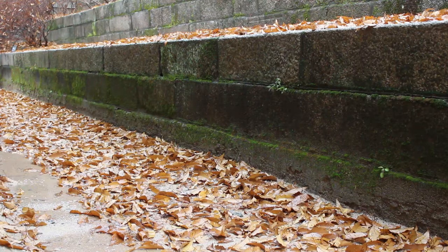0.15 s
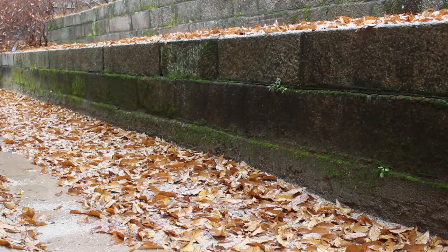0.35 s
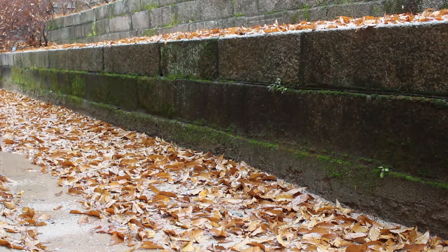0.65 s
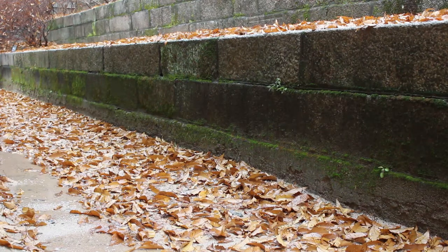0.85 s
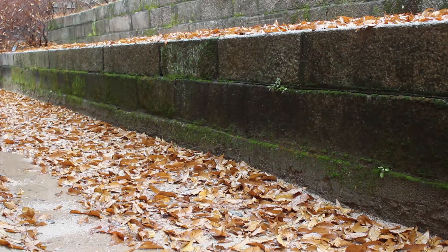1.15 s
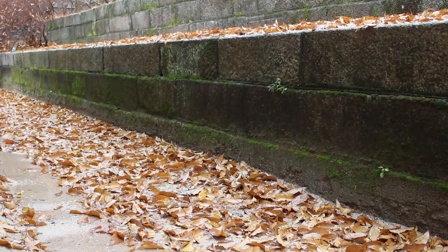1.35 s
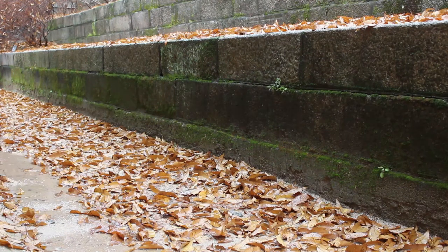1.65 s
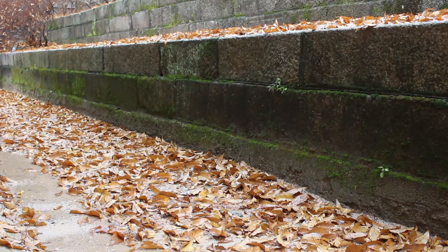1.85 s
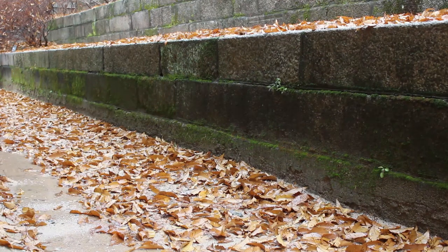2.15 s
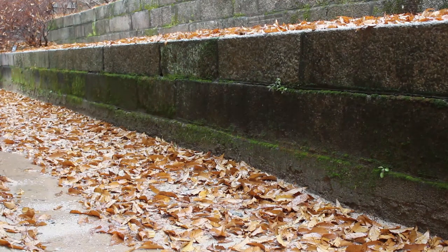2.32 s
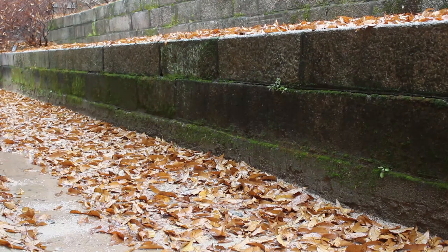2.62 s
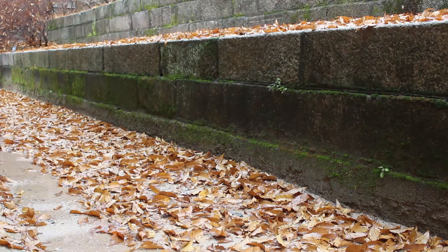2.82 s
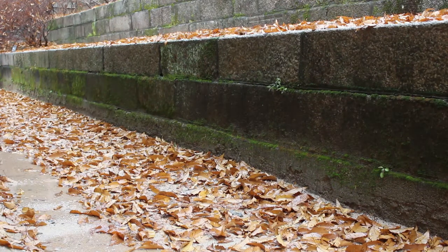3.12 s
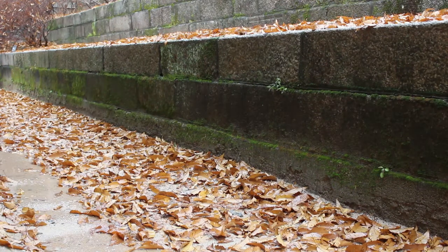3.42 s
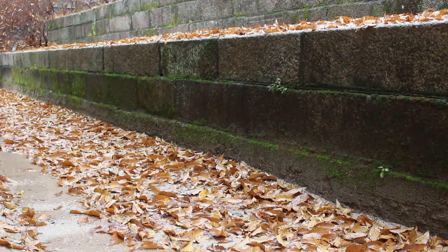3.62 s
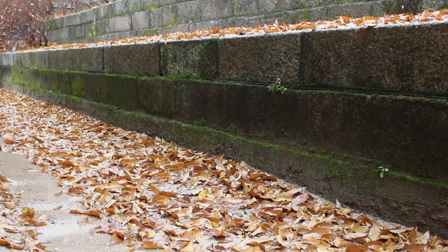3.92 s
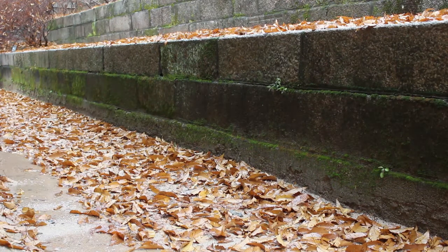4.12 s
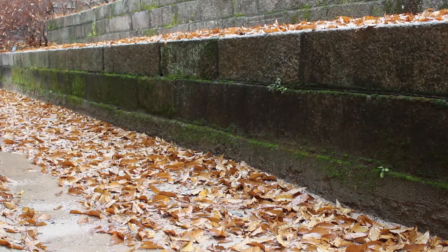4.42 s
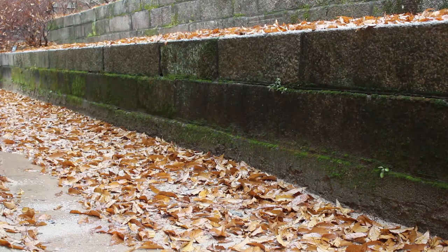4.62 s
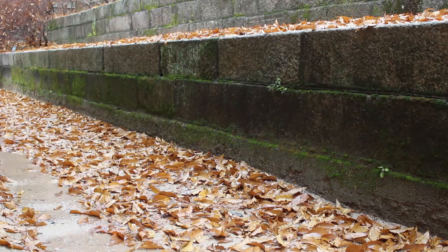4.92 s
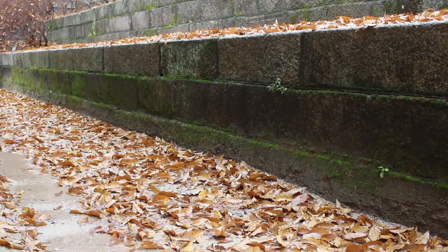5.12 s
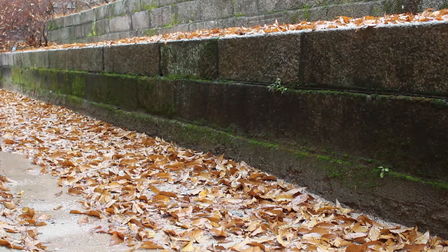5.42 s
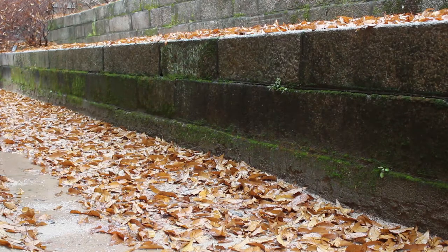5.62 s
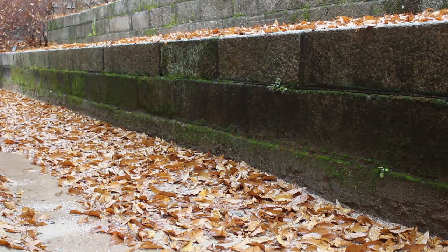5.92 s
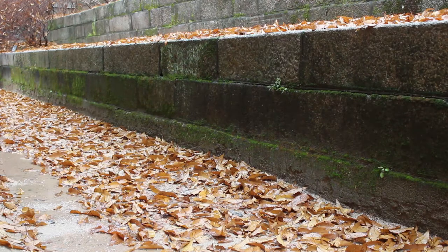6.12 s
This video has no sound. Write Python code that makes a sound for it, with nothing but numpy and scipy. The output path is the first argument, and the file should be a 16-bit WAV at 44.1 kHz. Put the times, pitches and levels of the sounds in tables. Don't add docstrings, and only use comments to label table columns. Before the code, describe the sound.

Sharp irregular raindrops tap leaves and water beside a stone wall, with fine spray crackles and bursts of husky birdsong.

```python
import sys
import numpy as np
from scipy import signal
from scipy.io import wavfile
from scipy.ndimage import uniform_filter1d

SR = 44100
rng = np.random.default_rng(int(sys.argv[2]) if len(sys.argv) > 2 else 0)


def wav_record(signal):
    frames = np.transpose(np.atleast_2d(signal))
    bounded = np.clip(frames, -1, 1)
    quanta = np.round(bounded * 32767).astype(np.int16)
    wavfile.write(sys.argv[1], SR, quanta)


def how_loud(loudness_db):
    steps = np.asarray(loudness_db, float) / 20
    return 10 ** steps


N = 276066


def rms_one(x):
    return x / np.sqrt(np.mean(x ** 2) + 1e-20)


def peak_one(x):
    return x / np.abs(x).max()


def drift(rate):
    r = np.exp(-80 * np.pi * rate / SR)
    slow = signal.lfilter([1], [1, -2 * r, r * r], rng.standard_normal(N // 40 + 2002))[2000:]
    return np.interp(np.arange(N) / 40, np.arange(len(slow)), rms_one(slow))


def swells(rows, rest_db):
    t = np.arange(N) / SR
    bursts = sum(how_loud(2 * db - 20 * np.abs(t - s) / width) for s, db, width in rows)
    return 10 * np.log10(how_loud(2 * rest_db) + bursts)


def band(x, low_hz, high_hz, order=2):
    edges = [low_hz, min(high_hz, .45 * SR)]
    return signal.sosfilt(signal.butter(order, edges, "band", fs=SR, output="sos"), x)


def resonance(x, hz, width_hz):
    r = np.exp(-np.pi * width_hz / SR)
    poles = [1, -2 * r * np.cos(2 * np.pi * hz / SR), r * r]
    return signal.lfilter([(1 - r * r) / 2, 0, (r * r - 1) / 2], poles, x)


def tail(x, t60, low_hz, high_hz):
    t = np.arange(SR) / SR
    echoes = band(rng.standard_normal(SR), low_hz, high_hz, order=1) * how_loud(-60 * t / t60)
    return signal.fftconvolve(x, echoes / np.linalg.norm(echoes))[:N]


def hiss(spectrum, patchy_db):
    edges = 20 * 2 ** (np.arange(30) / 3)
    white = rng.standard_normal((2, N))
    hz, level_db = np.transpose(spectrum)
    out = 0
    for k, (low, high) in enumerate(zip(edges, edges[1:])):
        top_db = np.interp(np.log(low * high) / 2, np.log(hz), level_db)
        out = out + how_loud(top_db + patchy_db * drift(11)) * band(white[k % 2], low, high)
    return rms_one(out)


def patter(per_s, spread_db, low_hz, high_hz, cycles):
    sizes = how_loud(spread_db * np.minimum(rng.exponential(1, N), 4)) * rng.choice([-1, 1], N)
    clicks = sizes * (rng.random(N) < per_s / SR) + 1e-18
    dealt = rng.integers(0, 14, N)
    pitches = np.geomspace(low_hz, high_hz, 14)
    return rms_one(sum(resonance(clicks * (dealt == k), hz, hz / cycles) for k, hz in enumerate(pitches)))


def port_noise():
    # (frequency [Hz], density [dB per Hz])
    ports = [(47, -56), (80, -30.5), (436, -2), (1480, -11), (1660, -18), (1900, -17), (4430, -7.5),
             (13200, 3.5), (15400, -1.5), (16500, -19)]
    return how_loud(-64.5) * hiss(ports, patchy_db=-3.5) * [[1], [-1]]


def electronics():
    whine_hz = 15734
    whine = how_loud(-79) * np.sin(2 * np.pi * whine_hz * np.arange(N) / SR)
    return whine + how_loud(-69) * rms_one(band(rng.standard_normal(N), 9500, 19000, order=1))


def wind_bumps():
    # (time [s], level [dB], time to lose 10 dB on either side [s])
    gusts = [(0, -55, 0.108), (.68, -50.5, 0.166), (.91, -54.5, 0.108), (1.27, -41.5, 0.126),
             (1.55, -47.5, 0.374), (2.45, -58, .4), (3.0, -54, 0.078), (3.21, -48.5, 0.058),
             (3.58, -43, 0.11), (3.8, -46, 0.305), (4.4, -48, 0.53), (4.78, -41.5, .14), (5.25, -50, 0.246),
             (5.9, -54, .15), (6.09, -49, .08)]
    level_db = swells(gusts, rest_db=-66.5) - 3.5 + 1.7 * drift(10.3)
    return how_loud(level_db) * rms_one(band(rng.standard_normal(N), 14.6, 70.3))


def far_rain():
    # (frequency [Hz], density [dB per Hz])
    colour = [(12, -30), (20, 10.5), (43, -7), (86, -8), (237, -11), (382, -2), (839, -2.5), (1180, -5),
              (1390, -3), (2120, -10.5), (3230, -11.5), (4930, -15.5), (6530, -19), (15200, -32.5),
              (16500, -44)]
    # (time [s], level [dB])
    shower = [
        (0, -46.5),
        (.4, -48),
        (.85, -45),
        (1.9, -47),
        (2.8, -45),
        (4.3, -46),
        (5.7, -47.5),
        (6.26, -47),
    ]
    s, db = np.transpose(shower)
    level_db = np.interp(np.arange(N) / SR, s, db)
    small_drops = patter(800, 3.4, 508.6, 3000, cycles=4.8)
    return how_loud(level_db + 3.0) * (hiss(colour, patchy_db=2.1) + how_loud(-8) * small_drops)


def note(s, length):
    t = np.arange(round(length * SR)) / SR
    return round(s * SR), t, np.sqrt(2) * np.sin(np.pi * t / length) ** .4


def whistles(calls, glide_s, rough):
    out = np.zeros(N + SR)
    wobble = rms_one(band(rng.standard_normal(N + SR), 30, 450))
    for s, length, from_hz, to_hz, db in calls:
        i, t, swell = note(s, length)
        hz = to_hz + (from_hz - to_hz) * np.exp(-t / glide_s)
        hz = hz * (1 + rough * wobble[i:i + len(t)])
        out[i:i + len(t)] += how_loud(db) * swell * np.sin(2 * np.pi * np.cumsum(hz) / SR)
    return out[:N]


def chorus():
    # (time [s], level [dB], time to lose 10 dB on either side [s])
    bouts = [(0.12, -39, 0.195), (1.24, -37.5, 0.186), (1.53, -40.5, .08), (1.87, -35.5, 0.07),
             (2.2, -39.5, 0.116), (2.44, -32, 0.41), (3.05, -34, 0.424), (3.54, -34.5, 0.32),
             (3.75, -35, .25), (4.02, -40.5, 0.31), (4.67, -26.5, .11), (4.95, -34, 0.325),
             (5.25, -42, 0.11), (5.61, -34, 0.053), (6.03, -35, .07), (6.14, -42.5, 0.062)]
    calls = [(6.2 * a, .05 + .06 * b, 3500 + 900 * c, 5300 + 1500 * d, 0)
             for a, b, c, d in rng.random((300, 4))]
    blur = tail(whistles(calls, glide_s=.05, rough=.05), .7, 2000, 9000)
    blur = np.roll(blur, -SR // 2)
    even = blur / np.sqrt(uniform_filter1d(blur ** 2, size=6000) + 1e-9)
    return how_loud(swells(bouts, rest_db=-64) - 12.5) * even


def husky_whistler():
    # (time [s], length [s], start pitch [Hz], end pitch [Hz], level [dB])
    song = [(.845, .15, 3600, 5250, -52.5), (1.045, .17, 3800, 6250, -50.5), (1.12, 0.097, 4000, 5600, -51),
            (1.33, 0.105, 4400, 5913, -53.5), (2.30, 0.095, 6170, 4503, -49),
            (2.42, 0.292, 4805, 6010, -55), (2.70, .16, 5187, 4413, -50), (2.85, 0.071, 4850, 6590, -50),
            (3.14, 0.121, 5180, 5896, -46.5), (3.42, 0.106, 4400, 6045, -48),
            (3.80, .075, 4980, 5903, -49.5), (4.05, 0.064, 4817, 6600, -50.5),
            (4.61, .06, 3800, 6300, -42.5), (4.71, 0.078, 3834, 6200, -47), (4.86, .07, 3800, 6508, -44),
            (4.97, 0.039, 3860, 4683, -48), (5.53, 0.105, 3273, 6070, -47), (5.58, .12, 3700, 6000, -51)]
    husky = whistles(song, glide_s=.054, rough=.045)
    near_echo, far_echo = tail(husky, .2, 1000, 9000), tail(husky, .65, 1000, 9000)
    return how_loud(-2.5) * (how_loud(-8) * husky + how_loud(-3) * near_echo + how_loud(1.5) * far_echo)


def clear_whistler():
    # (time [s], length [s], start pitch [Hz], end pitch [Hz], level [dB])
    clear = [
        (3.045, .04, 4250, 7000, -44.5),
        (4.63, .05, 3800, 6300, -44),
        (4.856, .035, 3850, 6200, -48),
    ]
    # (time [s], length [s], start pitch [Hz], end pitch [Hz], level [dB])
    low_call = [
        (.62, .13, 1620, 1600, -48),
        (.76, .18, 1600, 1530, -48),
    ]
    direct = whistles(clear, glide_s=.07, rough=.011) + whistles(low_call, glide_s=.07, rough=.045)
    return direct + how_loud(-7) * tail(direct, .35, 1000, 9000)


def chatter():
    # (time [s], length [s], level [dB])
    harsh = [(1.747, 0.06, -45.5), (1.845, 0.045, -45), (1.972, 0.065, -45), (2.062, 0.044, -46.5),
             (2.252, 0.0513, -47), (2.329, 0.0945, -49.5), (2.533, 0.0595, -47.5), (2.635, 0.0476, -46),
             (2.803, 0.099, -50), (2.895, 0.065, -49.5), (3.1, 0.083, -50), (3.409, 0.082, -50.5),
             (3.773, 0.1, -50), (3.868, 0.065, -51), (4.05, 0.182, -50.5)]
    # (frequency [Hz], width [Hz], level [dB])
    throat = [
        (2480, 1000, 0.),
        (5400, 1400, -9.),
    ]
    gate = np.zeros(N)
    for s, length, db in harsh:
        i, t, swell = note(s, length)
        gate[i:i + len(t)] += how_loud(db) * swell
    pulses = (rng.random(N) < 2200 / SR) * rng.standard_normal(N)
    voice = sum(how_loud(db) * resonance(resonance(pulses, hz, w), hz, w) for hz, w, db in throat)
    direct = gate * rms_one(voice)
    return direct + how_loud(-6) * tail(direct, .3, 1000, 9000)


def leaf_spray():
    # (time [s], level [dB], time to lose 10 dB on either side [s])
    bursts = [(.2, -55, .5), (1.04, -53, 0.23), (1.53, -50, 0.12), (1.87, -55, 0.02), (2.13, -41.5, 0.1122),
              (2.4, -52, 0.01), (3.05, -50, 0.2053), (3.4, -56.5, .3), (3.75, -43, 0.2117),
              (4.02, -56.5, 0.24), (4.53, -47.5, 0.205), (4.78, -54, 0.24), (5.61, -54.5, 0.1),
              (6.01, -54, .04), (6.15, -50, .07)]
    crackle = patter(1400 * how_loud(4 * drift(14)), 5.0, 4500, 10500, cycles=3.2)
    return how_loud(swells(bursts, rest_db=-69) - 3) * crackle


def quiver():
    # (time [s], rms level [dB], frequency [Hz], width [Hz], time to die by 60 dB [s])
    shaken = [
        (.102, -40, 5200, 500, .1),
        (3.229, -32, 2250, 420, .3),
        (3.523, -41, 1400, 800, .2),
        (5.203, -34, 3100, 800, .14),
        (5.204, -35, 1500, 900, .12),
        (5.417, -31, 1250, 700, .12),
    ]
    t, out = np.arange(SR // 4) / SR, np.zeros(N + SR)
    for s, db, hz, width_hz, t60 in shaken:
        noise = rng.standard_normal(len(t))
        ring = rms_one(resonance(resonance(noise, hz, width_hz), hz, width_hz))
        out[round(s * SR):][:len(t)] += how_loud(db - 60 * t / t60) * ring
    return out[:N]


def slaps(count, burst_s, burst, rattle_s, rattle):
    t = np.arange(SR // 14) / SR
    noise = rng.standard_normal((count, len(t)))
    splinter = burst * np.exp(-t / burst_s) + rattle * np.exp(-t / rattle_s)
    return np.sign(noise) * (t == 0) + noise * splinter


def contacts():
    # (time [s], peak level [dB], leaf ring [Hz], ring spread [pitch ratio], thud [dB below the peak])
    heavy = [(.135, -18, 1000, 1.8, -14), (.475, -19.5, 4460, 1.25, -26),
             (1.253, -20.5, 2316, 1.255, -17.5), (1.3483, -11.5, 3900, 1.17, -30),
             (1.547, -19, 3420, 1.36, -19), (3.039, -18.5, 2100, 1.36, -19), (3.095, -19, 5270, 1.67, -40),
             (3.221, -2.3, 2450, 1.42, -24), (3.5098, -10.5, 1450, 1.27, -22),
             (3.5198, -15.5, 1300, 1.3, -20), (4.1538, -18, 2300, 1.66, -20.5),
             (4.1893, -13, 4200, 1.25, -26), (4.2462, -20, 1050, 3, -22), (5.1874, -15, 2400, 1.25, -28),
             (5.1996, -9, 2950, 1.22, -32), (5.4143, -8.5, 1600, 1.55, -16), (6.1377, -10, 2700, 1.15, -22)]
    # (time [s], peak level [dB], ring [Hz], spread [pitch ratio])
    wet = [(.17, -30, 880, 1.177), (.9622, -27, 3840, 1.09), (1.129, -26, 1314, 1.185),
           (1.651, -22, 1027, 1.84), (1.881, -22.5, 1046, 1.65), (2.201, -25, 3826, 1.05),
           (2.603, -30, 2000, 2.13), (2.773, -26, 1500, 3), (3.163, -23.5, 4250, 2.07),
           (3.607, -27, 1010, 3), (3.917, -31, 3000, 1.084), (3.969, -32.5, 1490, 1.57),
           (3.985, -35, 1270, 1.46), (4.734, -29, 1260, 1.34), (4.931, -28, 944, 2.4),
           (5.056, -23, 1080, 2.19), (5.105, -30.5, 1060, 2.3), (5.275, -29, 920, 1.6),
           (5.525, -27, 1430, 2.3)]
    # (time [s], peak level [dB], ring [Hz], spread [pitch ratio])
    dry_leaf = [(.0976, -24, 3900, 1.08), (.271, -27, 3020, 1.146), (.333, -26, 1400, 1.45),
                (.7063, -19.5, 3460, 1.25), (.9867, -22, 3400, 1.293), (1.461, -23.5, 1180, 1.65),
                (1.6, -24, 3740, 1.135), (2.035, -30.5, 1500, 1.8), (2.114, -31.5, 1537, 1.135),
                (2.244, -30, 2390, 1.2), (2.4159, -23.5, 3910, 1.195), (2.4758, -21.5, 3090, 1.198),
                (2.69, -25, 4350, 1.6), (3.076, -27, 2330, 1.144), (3.118, -28.5, 1540, 1.23),
                (3.649, -32.5, 5000, 1.06), (3.714, -22, 4900, 1.256), (3.746, -30, 1250, 1.135),
                (4.043, -26, 1434, 1.154), (4.313, -27, 1430, 1.167), (4.489, -20, 1130, 1.65),
                (4.4987, -23, 3420, 1.114), (4.567, -25.5, 2820, 1.286), (5.0809, -25, 1090, 1.56),
                (5.493, -32.5, 860, 1.24), (5.963, -22, 1105, 1.306), (5.975, -28, 1200, 1.15),
                (6.0142, -29, 2800, 1.3)]
    # (time [s], peak level [dB], ring [Hz],
    # spread [pitch ratio])
    leaf_parts = [(3.222, -11, 4250, 1.09), (3.2262, -12, 2000, 1.22), (1.2251, -30, 1980, 1.2),
                  (.7836, -24, 4000, 1.2), (.9425, -30, 4200, 1.35), (.9945, -27, 3300, 1.2),
                  (1.5595, -31, 3300, 1.2), (2.2012, -24, 520, 1.7), (1.4606, -29, 2400, 1.5),
                  (1.6515, -28, 3250, 1.4), (.4755, -32, 1500, 1.8), (.7063, -31, 1500, 1.2),
                  (3.229, -24, 2900, 1.3), (3.62, -29, 520, 1.3), (5.4143, -17, 3000, 1.35),
                  (1.6297, -29, 4170, 1.2), (2.1785, -33, 1360, 1.25), (4.9195, -32, 1130, 1.25),
                  (5.2002, -20, 6500, 1.08), (5.2015, -20, 1800, 1.2), (3.2305, -24, 2300, 1.15),
                  (.1045, -30, 4100, 1.08), (1.3485, -23, 1300, 1.4), (1.3548, -24, 1500, 1.3),
                  (3.5105, -23, 4700, 1.12), (3.5196, -24, 3900, 1.15), (4.1965, -27, 4100, 1.12),
                  (4.2, -29, 1300, 1.3), (5.1926, -23, 1900, 1.15), (5.2002, -17, 5200, 1.1),
                  (5.205, -23, 1300, 1.4), (6.1378, -28, 5100, 1.12), (6.1435, -30, 2100, 1.2)]
    # (time [s], peak level [dB], ring [Hz])
    small = [(0.0662, -37, 2280), (0.4264, -37, 2330), (0.6519, -35, 4110), (0.7482, -36, 2050),
             (0.9338, -31, 4100), (1.3962, -37, 4030), (2.0632, -30, 2560), (2.6519, -29, 2620),
             (3.3578, -32, 2330), (4.9626, -31, 4250), (5.7573, -35, 2520), (5.8905, -39, 1930),
             (5.9254, -38, 4240), (6.0008, -30, 1980), (6.0262, -30, 4460)]
    # (time [s], peak level [dB], ring [Hz])
    plops = [(0.56, -36, 1090), (2.081, -35, 1480), (2.292, -35, 1590), (2.383, -34, 1520),
             (2.45, -35, 1250), (2.745, -35, 611), (2.879, -31, 619), (3.698, -33, 525), (4.418, -35, 1340),
             (4.453, -33, 1070), (4.838, -35, 861)]
    hits = [(*row, -20) for row in heavy] + [(*row, -9, -10) for row in wet]
    for s, db, hz, spread in dry_leaf:
        snap_db = -9.5 - 3.5 * np.log2(hz / 1000)
        hits.append((s, db, hz, spread, -19.5, snap_db))
    hits += [(*row, -40, -40) for row in leaf_parts]
    return hits + [(s - .0005, db, hz, 1.22, -30, -30) for s, db, hz in [*small, *plops]]


def taps():
    out, hits = np.zeros(N + SR), contacts()
    strikes = slaps(count=len(hits), burst_s=.0008, burst=.17, rattle_s=.004, rattle=.03)
    for (s, db, hz, spread, thud_db, snap_db), slap in zip(hits, strikes):
        spread = np.clip(spread, 1.005, 3)
        ring = peak_one(band(slap, hz / spread, hz * spread))
        thud, snap = peak_one(band(slap, 430, 1200)), peak_one(band(slap, 3600, 4900))
        tap = how_loud(0.5) * ring - how_loud(thud_db + 8.5) * thud - how_loud(snap_db + 7.0) * snap
        out[round((s + .0012) * SR):][:len(slap)] += how_loud(db) * tap
    return out[:N]


def thin_ticks():
    # (time [s], peak level [dB], ring [Hz], top [dB below the peak])
    sharp = [(.1012, -21, 5400, -30), (.1364, -21, 8430, -13.5), (.602, -36.5, 7240, -16),
             (.7836, -31, 7860, -19), (.9635, -23.5, 7880, -15), (1.063, -33, 7690, -17.5),
             (1.0964, -26, 6160, -16), (1.462, -24, 7000, -13.5), (1.601, -32.5, 5680, -11.5),
             (1.6516, -30.5, 6800, -12), (1.8823, -24.5, 5390, -13), (2.2026, -17.5, 7780, -14.5),
             (2.2438, -27, 12200, -9.5), (2.4171, -31.5, 6220, -16.5), (2.6898, -27, 5570, -14),
             (3.2222, -17, 7600, -15), (3.9125, -30, 6700, -18), (4.155, -25, 7600, -10),
             (4.1904, -14, 7500, -20.5), (4.5002, -29.5, 8000, -12), (5.057, -17.5, 11280, -5.5),
             (5.1886, -30, 7070, -8), (5.2008, -18, 6500, -13), (5.4154, -26, 5410, -16),
             (5.964, -34.5, 6750, -15.5), (6.1389, -33, 6730, -15)]
    # (time [s], peak level [dB], ring [Hz])
    soft = [(.2722, -27.5, 5900), (.3346, -17, 8140), (.4716, -28.5, 6850), (.6534, -29.5, 6500),
            (.708, -28, 5680), (.8643, -35, 7320), (.9345, -24, 6000), (1.3495, -24, 6570),
            (1.631, -30, 6550), (1.9908, -34, 7240), (2.0633, -24, 5730), (2.1146, -27.5, 6100),
            (2.1784, -28.5, 7700), (2.2912, -30, 5890), (2.3286, -30, 5800), (2.4413, -25, 5440),
            (2.4758, -29, 5810), (2.7744, -23.5, 5220), (2.8793, -27, 6130), (2.9986, -33, 6160),
            (3.0403, -29.5, 7100), (3.0769, -25, 8150), (3.1187, -17.5, 9900), (3.511, -29, 5330),
            (3.6087, -32.5, 6710), (3.6496, -24, 5550), (3.7065, -30.5, 7260), (3.8232, -29.5, 5800),
            (4.4999, -21, 6900), (4.5675, -29, 6960)]
    # (time [s], peak level [dB], ring [Hz])
    faint = [(0.0194, -36, 6770), (0.0962, -32, 6980), (0.2264, -41, 8070), (0.2957, -45, 7230),
             (0.4055, -44, 10400), (0.5606, -41, 7170), (0.7452, -43, 6510), (0.9941, -35, 7940),
             (1.0704, -33, 7270), (1.1288, -38, 6650), (1.5364, -38, 6980), (1.7285, -40, 7590),
             (1.9144, -43, 6910), (1.9934, -36, 7020), (2.0714, -33, 8320), (2.0814, -34, 7100),
             (2.0906, -32, 7080), (2.1254, -29, 9850), (2.1374, -32, 6720), (2.6844, -29, 6870),
             (2.7072, -32, 6830), (2.8454, -39, 6690), (2.9078, -38, 7070), (2.9248, -36, 6960),
             (3.1627, -28, 7290), (3.3134, -40, 8010), (3.3448, -39, 6850), (3.5524, -42, 8350),
             (3.6331, -35, 6720), (3.8666, -38, 6760), (3.9699, -39, 7230), (3.9868, -38, 7160),
             (4.1924, -24, 7370), (4.2901, -39, 10800), (4.4463, -41, 7840), (4.6954, -41, 7610),
             (4.7341, -42, 8030), (4.777, -36, 6690), (4.814, -39, 7210), (4.8738, -37, 7920),
             (4.9626, -42, 6790), (5.0165, -42, 7150), (5.0809, -31, 6810), (5.6271, -41, 8220),
             (5.7458, -38, 6860), (5.9244, -42, 9230), (6.0008, -35, 6530), (6.0252, -41, 6520),
             (6.0985, -41, 7610), (6.1434, -34, 6660),
             (.1211, -40, 6940), (.9228, -38, 8380), (1.4431, -38, 6000), (2.0994, -34, 7160),
                   (2.107, -35, 7400), (3.0165, -38, 6940), (3.4101, -42, 6680), (3.493, -40, 6520),
                   (4.4897, -29, 7420)]
    thin = [*sharp] + [(*row, -21.5) for row in soft]
    thin += [(s + .0006, db, hz, -18) for s, db, hz in faint]
    out = np.zeros(N + SR)
    strikes = slaps(count=len(thin), burst_s=.0016, burst=.3, rattle_s=.006, rattle=.08)
    for (s, db, hz, top_db), slap in zip(thin, strikes):
        ring = peak_one(band(slap, hz / 1.28, hz * 1.18))
        top = peak_one(band(slap, 9500, 14500, order=1))
        out[round(s * SR):][:len(slap)] += how_loud(db) * (ring - how_loud(top_db + 6.5) * top)
    return out[:N]


def wall(x):
    # (delay [s], level [dB])
    bounces = [
        (.0052, -21.),
        (.0098, -27.),
    ]
    dull = band(x, 746, 5200, order=1)
    echoes = sum(how_loud(db) * np.roll(dull, round(s * SR)) for s, db in bounces)
    return x + echoes + how_loud(-15) * tail(x, .09, 400, 7000)


def scene():
    birds = chorus() + husky_whistler() + clear_whistler() + chatter()
    near_rain = wall(leaf_spray() + taps() + thin_ticks()) + quiver()
    mid = electronics() + wind_bumps() + far_rain() + birds + near_rain
    return mid + port_noise()


def band_limit(x):
    return signal.sosfilt(signal.butter(12, 16810, fs=SR, output="sos"), x)


def record(dry):
    level_db = 20 * np.log10(np.abs(dry).max(axis=0) + 1e-9)
    over_db = np.maximum(level_db + 14, 0) * 0.203
    recover_db = 22 * np.arange(N) / SR
    duck_db = np.maximum.accumulate(over_db + recover_db) - recover_db
    ducked = dry * how_loud(-signal.lfilter([.004], [1, -.996], duck_db))
    shelf = signal.ellip(7, .2, 24, 15790, fs=SR, output="sos")
    cut = signal.ellip(10, .2, 60, 16700, fs=SR, output="sos")
    mix = signal.sosfilt(cut, signal.sosfilt(shelf, np.clip(ducked, -1, 1)))
    return band_limit(mix)


dry = scene()
out = record(dry)
wav_record(out)
```